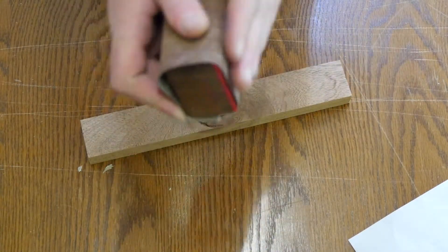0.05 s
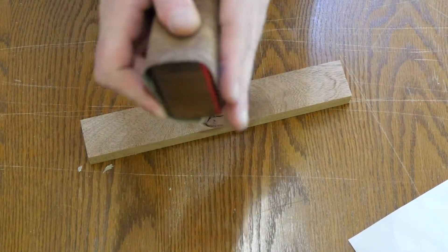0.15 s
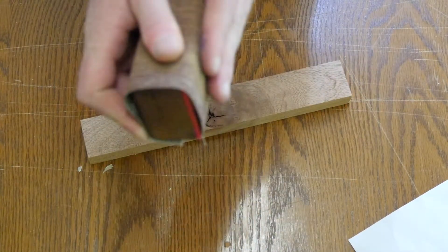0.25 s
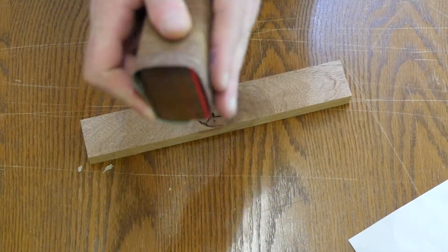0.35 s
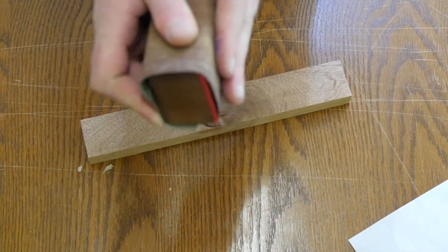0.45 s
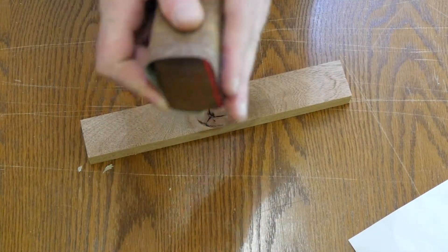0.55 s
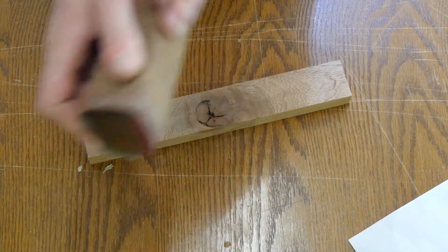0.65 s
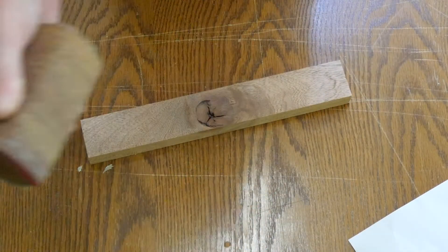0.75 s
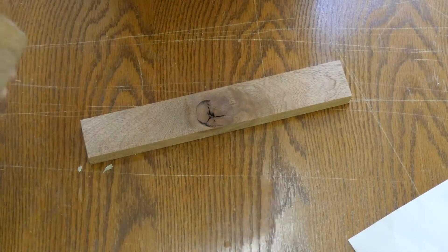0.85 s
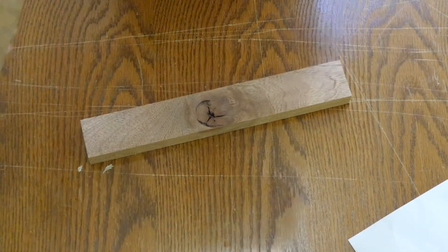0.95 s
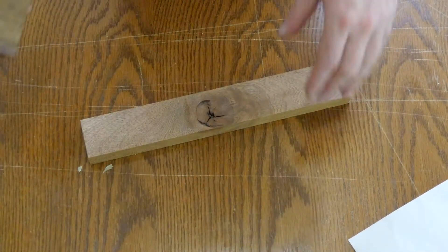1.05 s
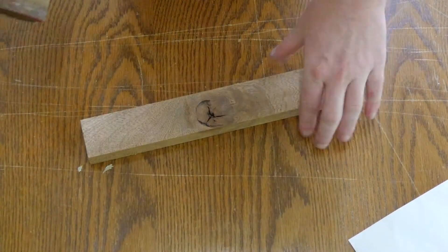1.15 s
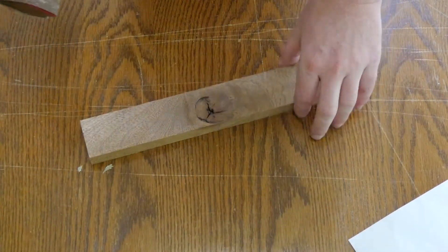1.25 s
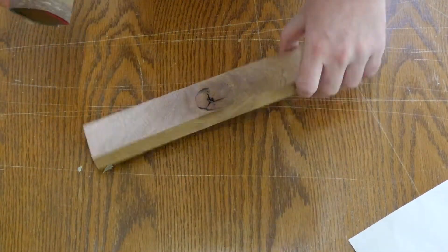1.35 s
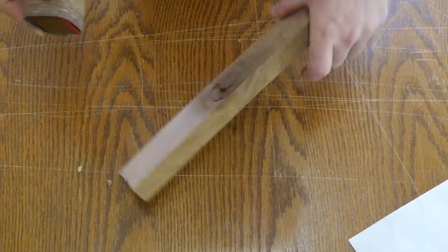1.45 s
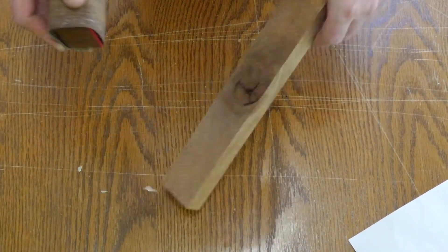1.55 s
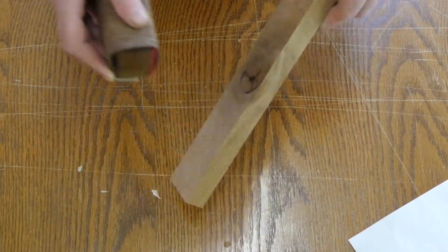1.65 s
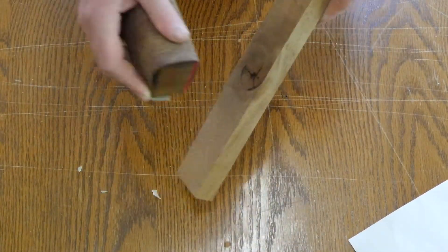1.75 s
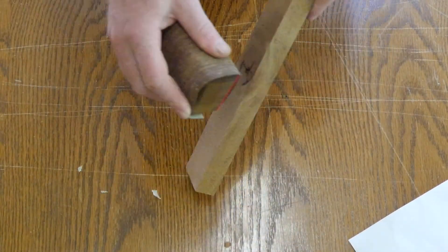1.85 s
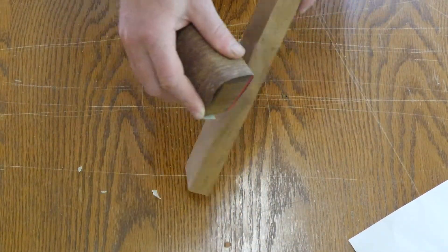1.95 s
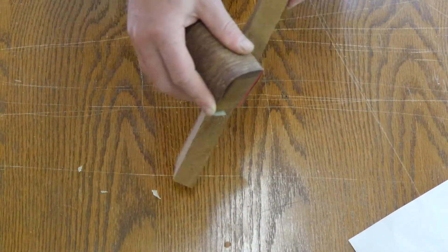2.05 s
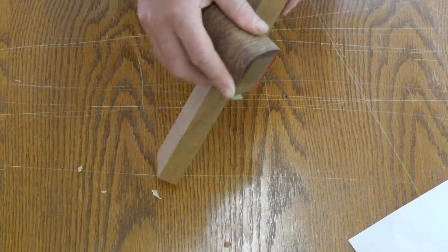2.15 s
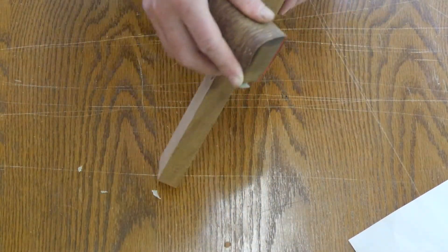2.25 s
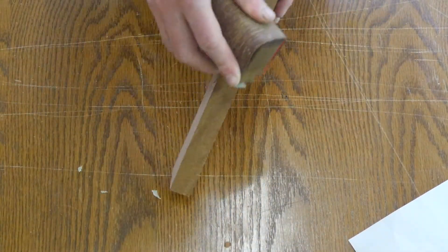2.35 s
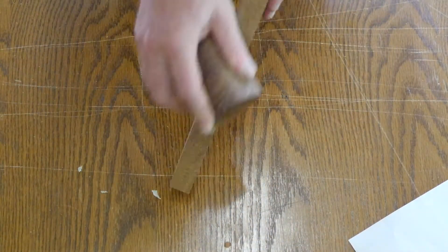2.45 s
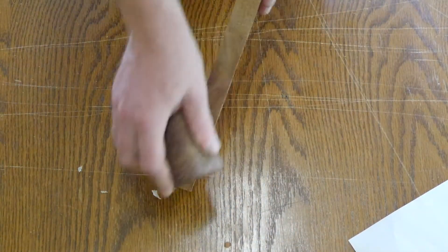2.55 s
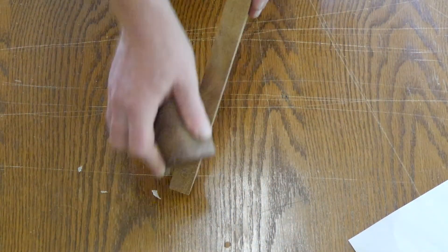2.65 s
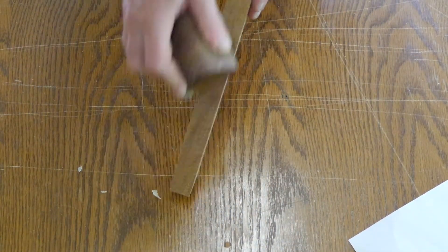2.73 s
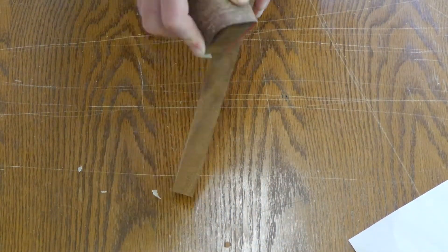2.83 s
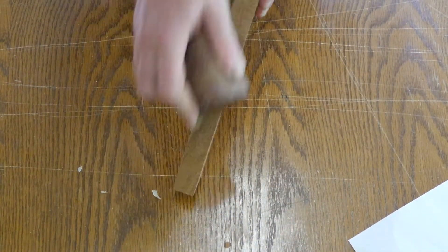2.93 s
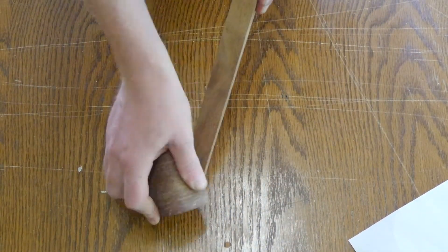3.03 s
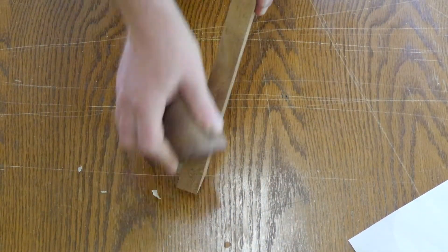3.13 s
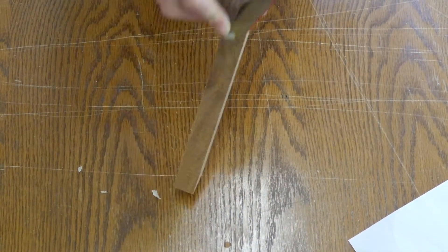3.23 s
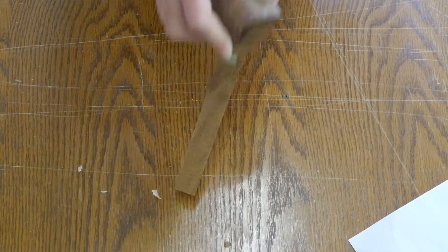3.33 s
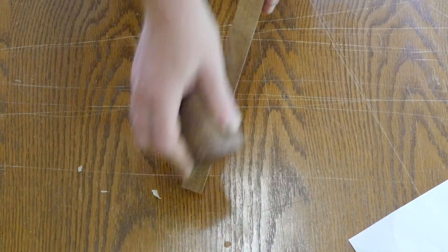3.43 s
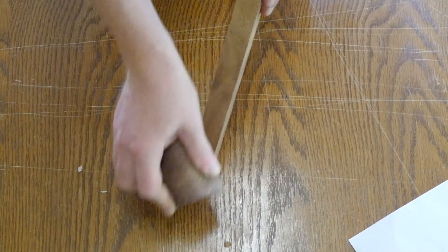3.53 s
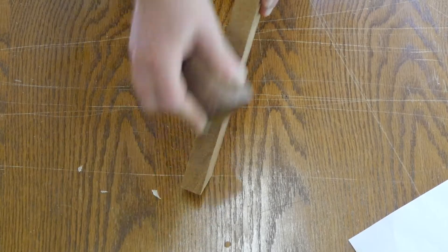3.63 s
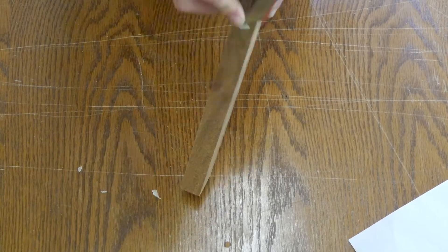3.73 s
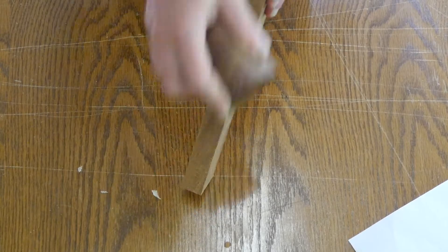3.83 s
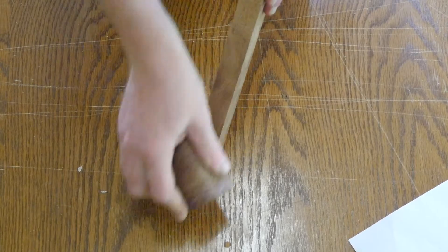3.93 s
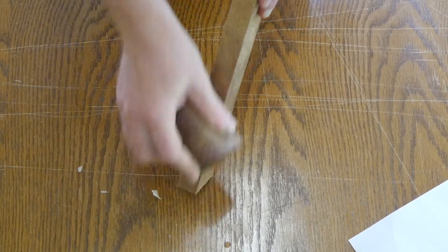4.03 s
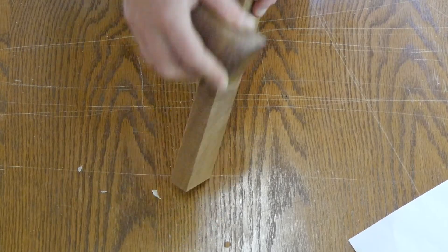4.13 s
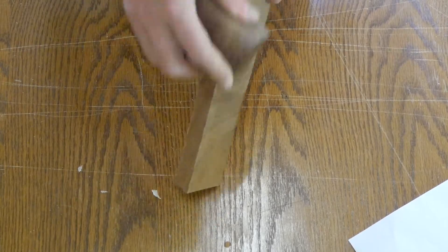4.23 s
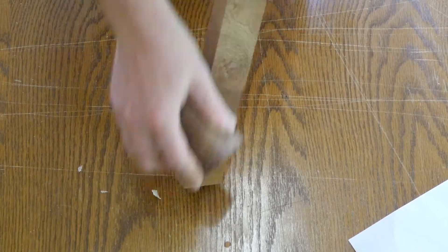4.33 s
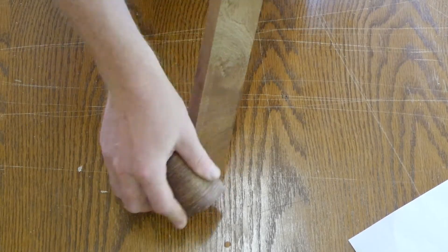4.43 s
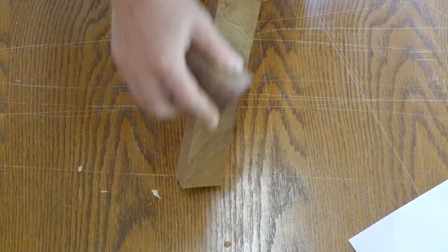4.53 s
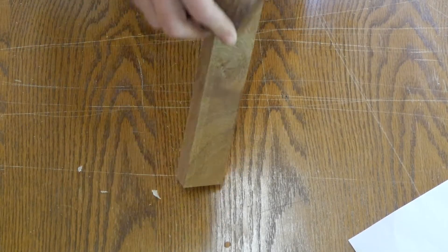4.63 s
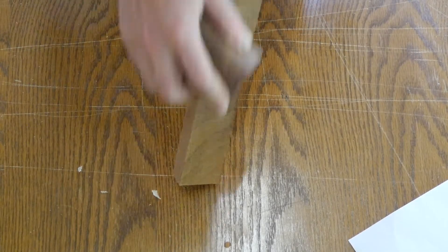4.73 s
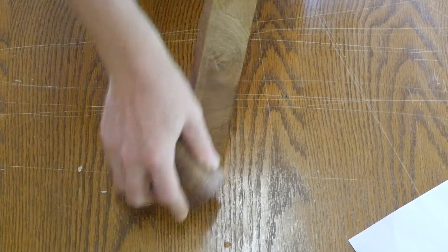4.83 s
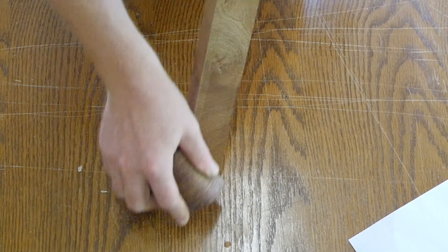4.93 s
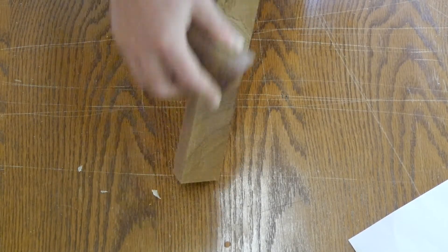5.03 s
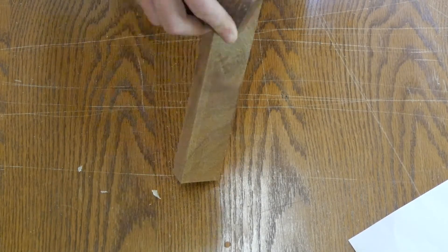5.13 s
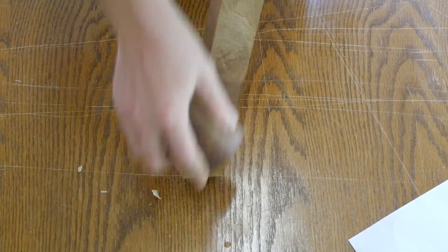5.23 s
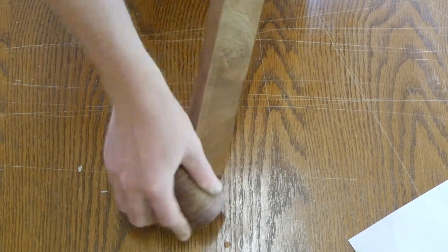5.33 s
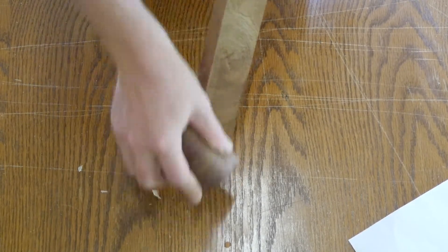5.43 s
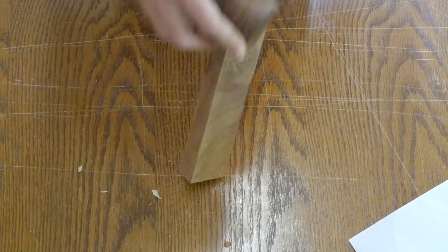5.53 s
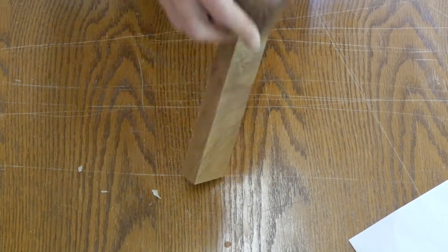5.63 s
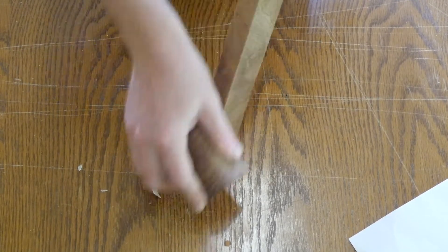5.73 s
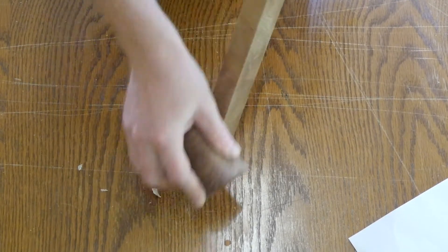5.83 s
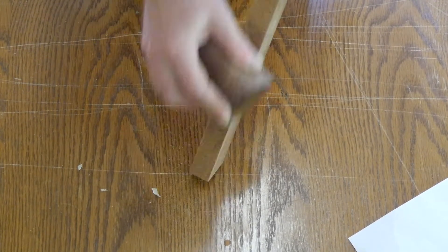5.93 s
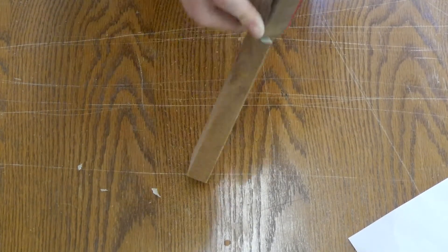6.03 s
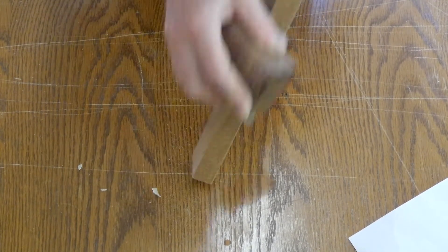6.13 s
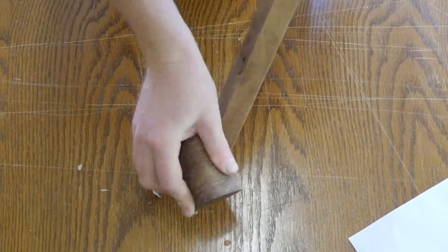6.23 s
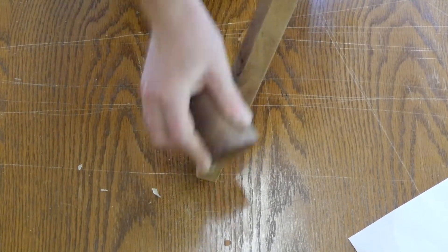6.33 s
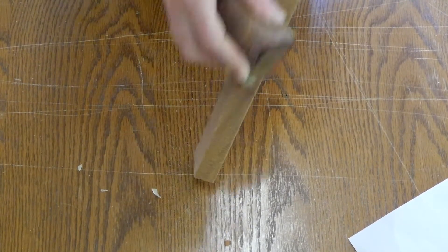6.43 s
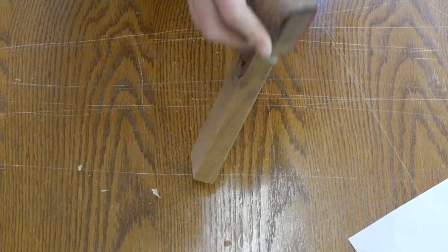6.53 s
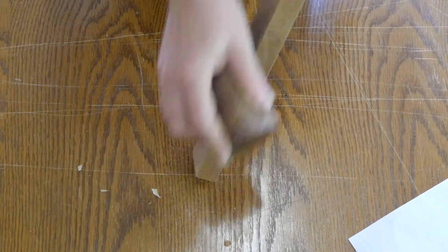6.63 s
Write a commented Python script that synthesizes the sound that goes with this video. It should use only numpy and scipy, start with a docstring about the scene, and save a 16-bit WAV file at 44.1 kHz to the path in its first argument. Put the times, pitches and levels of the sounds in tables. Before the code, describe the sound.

Quick dry wipes, a short wooden scrape and a loud clack, then steady fast sanding strokes on wood in a live workshop.

```python
"""A palm wipes the dust off a sanding block; a wooden slat is tipped up on its edge on a table, with a drag and knocks.
The block taps and creeps into place, then is rubbed to and fro: shaped grain noise rasps and hisses, while
decaying modes ring the slat, the block and the table top. Once, late on, the slat thumps down in mid-stroke.
A fairly live workshop of diffuse echoes and a steady hush, heard by a close stereo microphone."""
import sys
import numpy as np
from scipy import signal
from scipy.fft import rfft, irfft, next_fast_len
from scipy.io import wavfile
from scipy.ndimage import uniform_filter1d, map_coordinates

SR = 44100
rng = np.random.default_rng(int(sys.argv[2]) if len(sys.argv) > 2 else 0)


def to_wav(sig):
    """Store sig (one row per channel, or 1-D mono) as 16-bit WAV at the path in sys.argv[1].

    Samples outside -1..1 are clipped; the rate is SR.
    """
    pcm = np.clip(np.atleast_2d(sig), -1, 1) * 32767
    pcm = np.round(pcm).astype(np.int16)
    wavfile.write(sys.argv[1], SR, pcm.T)  # frames by channels


N = 294588
TIME = np.arange(N) / SR

# sanding strokes, away and back in turn: (start [s], share of the stroke at which it is fastest,
# relative rasp level [dB], slat and air ring against rasp [dB], fine hiss against rasp [dB],
# table drumming level [dB], air gap pitch in mid-travel [Hz])
STROKES = [(2.391, .52, -31.5, 6.5, -1, -35.5, 1310), (2.63, 0.5, -24.5, -2, -3.5, -35, 1346),
           (2.859, 0.43, -25.5, 0, -0.5, -35.5, 1541), (3.085, 0.48, -24, -3, -1, -36, 1421),
           (3.31, 0.48, -27, -.5, 2, -35, 1502), (3.55, 0.48, -24.5, -8, 0.5, -36.5, 1498),
           (3.771, 0.43, -26.5, -6, 2, -42.5, 1563), (3.999, .6, -26, -0.5, 1, -37.5, 1360),
           (4.225, 0.4, -26.5, 3.5, -4, -33, 1366), (4.46, 0.54, -25.5, -1, -2.5, -38, 1425),
           (4.695, 0.39, -26.5, 1, -2.5, -35, 1483), (4.939, 0.58, -26, -3.5, -2, -35.5, 1448),
           (5.165, 0.32, -27, -0.5, -1, -38, 1410), (5.4, 0.67, -26.5, -2, -2.5, -37, 1354),
           (5.619, .46, -27.5, 1.5, -1.5, -36.5, 1448), (5.84, 0.41, -27.5, -5, 1, -36.5, 1329),
           (6.064, 0.46, -27.5, 1, -0.5, -33.5, 1405), (6.291, 0.44, -26.5, -6.5, -2.5, -36, 1411),
           (6.525, 0.47, -26, -2, 0, -35, 1500)]
# table top modes, some short and some lingering: (frequency [Hz], level [dB], t60 [s])
TABLE_MODES = [(141.6, -8, 0.071), (296.7, 2, 0.069), (388.8, -12, 0.18), (536, -11, 0.03),
               (770, -20.5, 0.009), (886, -26.5, 0.07), (1042, -18.5, 0.043), (1697, -19.5, 0.032),
               (177.5, -28.5, 0.74), (284, -25.5, 0.66), (507.6, -21.5, 0.24), (428.4, -21, 0.1),
               (2430, -38, 0.26)]
# colour of the coarse rasp: (frequency [Hz], relative density [dB per Hz])
RASP_COLOUR = [(300, -53), (550, -12.5), (750, -8.5), (1100, -4), (2000, 2.5), (3200, 1.5), (4500, -0.5),
               (6600, -1), (9000, -7), (15000, -12)]


def sanding():
    """Faster movement drags more grains over the wood; these rasp, hiss and ring the slat and the table."""
    # fine hiss: (frequency [Hz], relative density [dB per Hz])
    hiss_colour = [(5000, -29), (7000, -9), (8300, -2.5), (9400, 1), (10400, 3), (11500, -1.5),
                   (13000, -8.5), (14800, -27), (15600, -30)]
    grains_per_s, grains_turn_db = 24000, -9  # at full speed; thinning at the turns
    # level lost as the block slows to a turn, in dB
    rasp_turn_db, ring_turn_db, hiss_turn_db, drum_turn_db = -12.5, -12.5, -18.5, -1
    speed_power, bite_s = 1.197, .03  # how sharply slowness follows speed; time the first stroke takes to bite
    wobble_per_s, wobble_db = 24, 1.85  # the hand's pressure is uneven

    count, place = stroke_count(), travel()
    rasp_db, ring_db, hiss_db, drum_db, gap_hz = (per_stroke(c, count) for c in np.transpose(STROKES)[2:])
    slowness = 1 - np.abs(np.sin(np.pi * count)) ** speed_power  # 1 at a turn, 0 at full speed
    contact = np.clip((TIME - STROKES[0][0]) / bite_s, 0, 1)
    per_s = grains_per_s * from_db(grains_turn_db * slowness)

    rasp_grains = grit(per_s, spread_db=2.0, catch_db=0.93)
    rasp = from_db(1.5 + rasp_turn_db * slowness) * colour(rasp_grains, RASP_COLOUR)

    slat_grains = grit(per_s / 4, spread_db=-1.0, catch_db=3.5)
    wood = from_db(-6) * rms_one(slat(slat_grains, place, node_depth=0.39))
    hollow = from_db(-0.57) * air_gaps(grit(6000, spread_db=4.0, catch_db=2.0), place, gap_hz)
    # bodies this small radiate no bass
    ringing = from_db(ring_db - 2.5 + ring_turn_db * slowness) * high_pass(wood + hollow, hz=970)

    rub = high_pass(rasp, hz=160) + ringing
    rub = table_bounce(rub, place, strength=0.1, near_s=0.001616, extra_s=0.0007)

    hiss_grains = grit(per_s, spread_db=1.0, catch_db=0.5)
    hiss = from_db(hiss_db + 2.0 + hiss_turn_db * slowness) * colour(hiss_grains, hiss_colour)

    slips = grit(1200, spread_db=1.2, catch_db=.8)
    drumming = from_db(drum_db + drum_turn_db * slowness) * judder(slips, low_hz=245)

    pressure = from_db(rasp_db + wobble_db * drift(wobble_per_s))
    return contact * (pressure * (rub + hiss) + drumming)


def stroke_count():
    """Strokes done so far, with fractions; half of each is done at its fastest moment."""
    last_stroke_s = .23
    starts, fastest = np.transpose(STROKES)[:2]
    turns = np.append(starts, starts[-1] + last_stroke_s)
    halfway = starts + np.clip(fastest, .1, .9) * np.diff(turns)
    marks = np.sort(np.append(turns, halfway))
    return np.interp(TIME, marks, np.arange(len(marks)) / 2)


def per_stroke(values, count):
    """Each stroke holds its own value; the grip changes smoothly at the turns."""
    held = np.asarray(values)[np.minimum(count.astype(int), len(values) - 1)]
    return uniform_filter1d(held, size=2000)


def travel():
    """Where the block is: 0 at the held end of the slat, 1 at the free end."""
    return .5 - .5 * np.cos(np.pi * stroke_count())


def slat(force, place, node_depth):
    """The slat's modes; each weakens when the contact passes over one of its nodes."""
    # slat held in the hand: (frequency [Hz], relative level [dB], t60 [s])
    slat_modes = [(1193, -13, 0.03), (1180, 11, 0.036), (1407, 10, 0.04), (1543, 7, 0.09), (1630, 8, 0.12),
                  (1794, -15, 0.1), (1963, 10.5, 0.055), (2200, 2, 0.0099), (2508, 12, 0.064),
                  (2764, 14.5, 0.033)]
    total = 0
    for k, (hz, db, t60) in enumerate(slat_modes):
        grip_on_mode = 1 + node_depth * np.cos(np.pi * (1 + k / 2) * place + k)
        total = total + (-1) ** k * from_db(db) * ring(force * grip_on_mode, hz, t60)
    return total


def air_gaps(grains, place, gap_hz):
    """Broad resonances of the air under the block, tuned by the grip and gliding with its place; rms 1."""
    # gaps between hand, block and table: (multiple of the gap pitch, relative level [dB],
    # t60 before the glide [s], glide over the travel [octaves])
    gap_modes = [(1.001, 1, 0.024, .33), (1.72, -3, 0.014, -.36), (2.1, -7.5, 0.012, -.3)]
    centre = np.mean(gap_hz)
    total = 0
    for multiple, db, t60, octaves in gap_modes:
        tone = rms_one(ring(grains, multiple * centre, t60))
        # reading faster or slower than real time bends the pitch
        speed = gap_hz / centre * 2 ** (octaves * (place - .5))
        total = total + from_db(db) * read_at(tone, np.cumsum(speed))
    return rms_one(total)


def table_bounce(x, place, strength, near_s, extra_s):
    """The bounce off the table top lags more as the block slides away, sweeping the colour."""
    return x + strength * read_at(x, (TIME - near_s - extra_s * place) * SR)


def table_top(force):
    """The table's modes, neighbours in the list swinging in opposite senses; the deepest bass does not radiate."""
    total = 0
    for k, (hz, db, t60) in enumerate(TABLE_MODES):
        total = total + (-1) ** (k + 1) * from_db(db) * ring(force, hz, t60)
    return high_pass(total, hz=61.0, order=3)


def judder(slips, low_hz):
    """Small slips carry little bass into the table; rms 1."""
    return rms_one(table_top(high_pass(slips, low_hz, order=1)))


def knocks():
    """Each blow is a short push on the table top, duller for a softer contact; the loose slat rings along."""
    # slat against table: (time [s], push level [dB], contact sharpness [Hz])
    blows = [(1.219, -42, 99), (1.241, -45, 150), (1.269, -36.5, 900), (1.396, -26, 2500),
             (1.416, -27, 606), (1.504, -20.5, 600), (1.518, -32, 250), (1.8057, -2.8, 1600),
             (2.315, -29, 200), (2.892, -25, 400), (3.334, -29.5, 400), (3.787, -33, 400),
             (4.188, -23.5, 200), (4.61, -24.5, 399.7), (5.3265, -4.5, 900), (5.3349, -24, 1482),
             (5.3472, -17, 1499), (6.141, -29, 396)]
    # the slat's deepest bend, struck only before sanding starts: (frequency [Hz], relative level [dB], t60 [s])
    loose_slat = (470, -16.5, 0.11)
    force, age = np.zeros(N), TIME[:SR // 50]
    main_hz = TABLE_MODES[1][0]
    for s, db, sharp_hz in blows:
        push = np.exp(-2 * np.pi * sharp_hz * age)
        push /= abs(np.sum(push * np.exp(-2j * np.pi * main_hz * age)))  # equal drive at the main mode
        force[int(s * SR):][:len(age)] += from_db(db) * push
    hz, db, t60 = loose_slat
    free_force = force * (TIME < STROKES[0][0])
    return table_top(force) + from_db(db) * ring(free_force, hz, t60)


def chattering():
    """Now and then the slat chatters and shakes the table top in a short burst."""
    # bursts: (time of the peak [s], level [dB])
    bursts = [(2.063, -34.5), (2.345, -41), (2.405, -35.5), (2.78, -39), (2.91, -34), (3.37, -35),
              (3.809, -29), (4.2, -33), (4.4, -36), (4.52, -32.5), (6.15, -29.5), (6.569, -38)]
    rise_s, fall_s = 0.026, 0.025
    peaks, db = np.transpose(bursts)
    slips = grit(1200, spread_db=1.2, catch_db=.8)
    return swells([(peak, rise_s, fall_s) for peak in peaks], db) * judder(slips, low_hz=252)


def taps(click_s):
    """Hard little contacts ring the block and crush a few grains."""
    # contacts of the block: (time [s], relative ring level [dB], click level [dB])
    contacts = [(1.804, -29.5, -33.5), (2.1571, -28, -39), (2.291, -48, -35), (2.35, -72, -42),
                (2.442, -30, -44)]
    force, crush = np.zeros(N), np.zeros(N)
    age = TIME[:SR // 20]
    for s, ring_db, click_db in contacts:
        force[int(s * SR)] = from_db(ring_db)
        crush[int(s * SR):][:len(age)] += from_db(click_db) * np.exp(-age / click_s)
    return block(force) + crush * colour(rng.standard_normal(N), RASP_COLOUR)


def settling():
    """The block creeps into place on the slat: a few grains crackle and keep it ringing."""
    # creeps: (time of the peak [s], rise [s], fall [s], block ring level [dB])
    creeps = [(2.196, 0.018, 0.025, -35), (2.265, .02, 0.022, -43), (2.405, .004, 0.054, -37.5)]
    rows = np.array(creeps)
    grains = grit(3500, spread_db=2.0, catch_db=1.5)
    crackle = from_db(-13.5) * colour(grains, RASP_COLOUR)
    return swells(rows[:, :3], rows[:, 3]) * (rms_one(block(grains)) + crackle)


def block(force):
    """The hollow ring of the sanding block, neighbouring modes in opposite senses."""
    # hollow sanding block: (frequency [Hz], relative level [dB], t60 [s])
    block_modes = [(1190, 2.5, 0.025), (1297, -8, 0.1), (1440, -6.5, 0.052), (2050, -1.5, 0.029),
                   (2270, -7.5, 0.063), (2350, -2, 0.013)]
    total = 0
    for k, (hz, db, t60) in enumerate(block_modes):
        total = total + (-1) ** k * from_db(db) * ring(force, hz, t60)
    return high_pass(total, hz=500)


def dragging():
    """The slat's corner slides over the table, scrapes and makes it judder."""
    # drags: (time of the peak [s], rise [s], fall [s], scrape level [dB], table judder level [dB])
    drags = [(1.29, .06, 0.081, -61, -61), (1.458, 0.028, .026, -38, -34.5),
             (1.538, 0.025, 0.025, -43, -31.5), (1.6, .04, 0.072, -50.5, -64), (1.75, .05, 0.071, -59, -77)]
    # scrape: (frequency [Hz], relative density [dB per Hz])
    scrape_colour = [(380, -21), (520, 2), (680, -6), (850, 0), (1000, -0.5), (1350, -10), (1700, -7),
                     (2050, -1.5), (2350, 3.5), (2700, -8), (3500, -17), (4200, -8), (5500, -26.5),
                     (10500, -21), (15000, -33)]
    rows = np.array(drags)
    scrape, shake = (swells(rows[:, :3], db) for db in rows[:, 3:].T)
    slips = grit(4000, spread_db=2.5, catch_db=2.5)
    return scrape * colour(slips, scrape_colour) + shake * judder(slips, low_hz=453)


def wiping():
    """Each pass of the palm over the abrasive swells and fades, a dull rub and a crisp one mixed."""
    # passes: (time of the peak [s], rise [s], fall [s], dull rub level [dB], crisp rub level [dB])
    wipes = [(.065, 0.0055, 0.018, -34, -40), (.125, .02, 0.018, -46, -47),
             (.243, 0.032, 0.017, -32.5, -34.5), (.362, 0.025, 0.014, -34.5, -37.5),
             (.445, .02, 0.017, -45, -44), (.523, 0.0033, .014, -39, -46),
             (0.551, 0.022, 0.014, -34, -36.5), (0.627, .016, 0.017, -34, -29.5),
             (.675, 0.035, 0.019, -56, -28)]
    # dull rub: (frequency [Hz], relative density [dB per Hz])
    palm_dull = [(150, -41), (450, -8), (650, -4), (900, 3), (1300, 2.5), (1800, 4.5), (2400, -2.5),
                 (3800, -5.5), (5500, -15), (7500, -19), (14000, -14.5)]
    # crisp rub: (frequency [Hz], relative density [dB per Hz])
    palm_crisp = [(1100, -22), (1750, 6.5), (2600, 4.5), (3800, 4.5), (5200, -0.5), (7500, -1), (10300, 4),
                  (12500, -3), (15000, -17)]
    rows = np.array(wipes)
    total = 0
    for db, spectrum in zip(rows[:, 3:].T, (palm_dull, palm_crisp)):
        grains = grit(14000, spread_db=-2.0, catch_db=1.0)
        total = total + swells(rows[:, :3], db) * colour(grains, spectrum)
    return total


def workshop(x, first_echo_s):
    """Diffuse echoes die away band by band, alike at both ports in the bass and far less so higher up."""
    # room: (frequency [Hz], t60 [s], reverberation level [dB], left-right likeness)
    room = [(80, 0.67, 8.5, 0.98), (157, 0.51, -11, .999), (302, 0.81, -6.5, 1), (542, 0.9, -1.5, 1),
            (1000, 0.67, 2, 0.41), (2020, 0.74, -3, 0.017), (3800, 0.76, -0.5, 0.012),
            (6800, 0.37, -4, 0.022), (11000, 0.4, -8, 0.088), (15500, 0.41, -10, .2)]
    hz, *columns = np.transpose(room)
    age, echoes = TIME[:SR], 0
    edges = np.geomspace(60, 16000, 17)
    for low, high in zip(edges, edges[1:]):
        t60, db, alike = (np.interp(np.log(low * high) / 2, np.log(hz), c) for c in columns)
        sos = signal.butter(2, [low, high], "band", fs=SR, output="sos")
        band = signal.sosfilt(sos, rng.standard_normal((2, SR)))
        band *= np.exp(-np.log(1000) * age / t60) * np.clip(age / first_echo_s - 1, 0, 1)
        mid, side = (rms_one(b) * np.sqrt(2 * (high - low)) / SR for b in band)
        echoes = echoes + from_db(db) * two_ears(mid, side, alike)
    return signal.fftconvolve(x[None], echoes, axes=1)[:, :N]


def room_hush():
    """Steady coloured noise, the same at both ports in the bass and wider above."""
    # hush: (frequency [Hz], relative density [dB per Hz])
    hush_colour = [(15, -77), (25, -58), (75, -25), (188, -11), (246, -12), (313, -10.5), (410, -10.5),
                   (1140, -20), (1750, -25), (2770, -29), (4150, -30.5), (7910, -38.5), (10100, -30),
                   (14300, -44), (15500, -42)]
    mid, side = colour(rng.standard_normal((2, N)), hush_colour)
    side = high_pass(side, hz=900)  # long waves reach both ports alike
    return from_db(-49.5) * two_ears(mid, side, 0.22)


def two_ears(mid, side, alike):
    """A left-right pair of given likeness from two unrelated signals."""
    alike = np.clip(alike, -1, 1)
    opposite = side * np.array([[1], [-1]])
    return (np.sqrt(1 + alike) * mid + np.sqrt(1 - alike) * opposite) / np.sqrt(2)


def grit(per_s, spread_db, catch_db):
    """Grains snag and let go at random, in uneven sizes and small clumps; rms 1."""
    chance = np.clip(per_s / SR, 1e-3, 1)
    sizes = from_db(spread_db * np.minimum(rng.exponential(1, N), 4)) * rng.choice([-1, 1], N)
    hits = (rng.random(N) < chance) * sizes / np.sqrt(chance)  # steady mean power at any rate
    return rms_one(hits * from_db(catch_db * drift(170)))


def ring(x, hz, t60):
    """A unit click sets a sine ringing, decaying by 60 dB in t60 seconds."""
    r, w = np.exp(-np.log(1000) / (t60 * SR)), 2 * np.pi * hz / SR
    return signal.lfilter([0, np.sin(w)], [1, -2 * r * np.cos(w), r * r], x + 1e-18)


def colour(x, spectrum):
    """Give a noise the slopes of a spectrum; rms 1."""
    hz, db = np.transpose(spectrum)
    size = next_fast_len(N)
    bins = np.log(np.fft.rfftfreq(size, 1 / SR) + 1)
    gain = from_db(np.interp(bins, np.log(hz), db))
    return rms_one(irfft(rfft(x, size) * gain, size)[..., :N])


def swell(s, rise, fall):
    """A movement that gathers up to its peak at s and dies away."""
    width = np.where(TIME < s, rise, fall)
    return np.exp(-.5 * np.minimum(((TIME - s) / width) ** 2, 60))


def swells(shapes, levels_db):
    """The joint gain of several movements, each (s, rise, fall); their powers add."""
    return np.sqrt(sum((from_db(db) * swell(*shape)) ** 2 for shape, db in zip(shapes, levels_db)))


def drift(rate):
    """Slow random wander with spread 1, through a given number of points per second."""
    knots = rng.standard_normal(N // 20)
    return map_coordinates(knots, [TIME * min(rate, 2000)], order=1) * np.sqrt(3 / 2)


def read_at(x, samples):
    """Read a signal between its samples."""
    return map_coordinates(x, [samples], order=3, mode="mirror")


def high_pass(x, hz, order=2):
    """Take out what lies below hz."""
    return signal.sosfilt(signal.butter(order, hz, "high", fs=SR, output="sos"), x)


def from_db(db):
    """Decibels to gain."""
    return 10 ** (np.asarray(db) / 20)


def rms_one(x):
    """Scale to unit power."""
    return x / np.sqrt(np.mean(x ** 2) + 1e-20)


def scene():
    """The work at the table, its echoes and the room's hush."""
    work = sanding() + knocks() + chattering() + taps(click_s=0.0021) + settling() + dragging() + wiping()
    # each end of the slat has its own pattern of echoes
    angle = np.pi / 2 * travel()
    echoes = sum(workshop(work * share, first_echo_s=0.002) for share in (np.cos(angle), np.sin(angle)))
    return work + echoes + room_hush()


def record(dry):
    """The recorder has one narrow notch in the treble and a steep top cut."""
    notch_hz, notch_q, cutoff_hz = 7860, 33, 15300
    notched = signal.lfilter(*signal.iirnotch(notch_hz, notch_q, fs=SR), dry)
    return signal.sosfilt(signal.ellip(12, .1, 90, cutoff_hz, fs=SR, output="sos"), notched)


dry = scene()
out = record(dry)
to_wav(out)
```